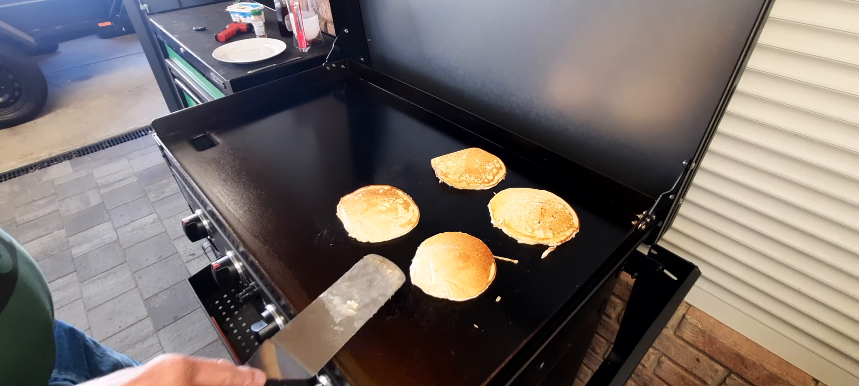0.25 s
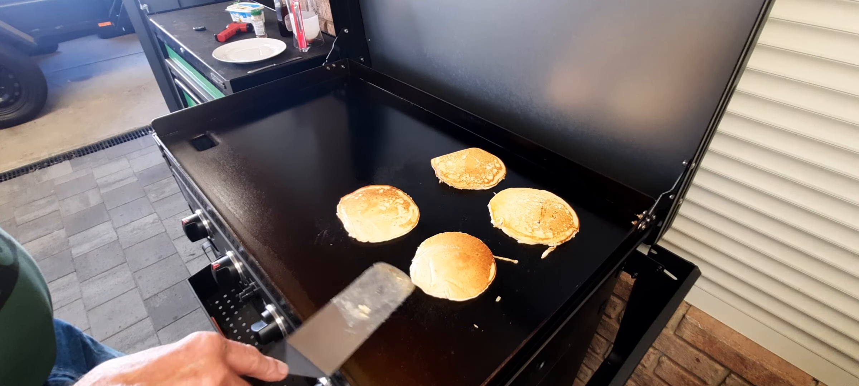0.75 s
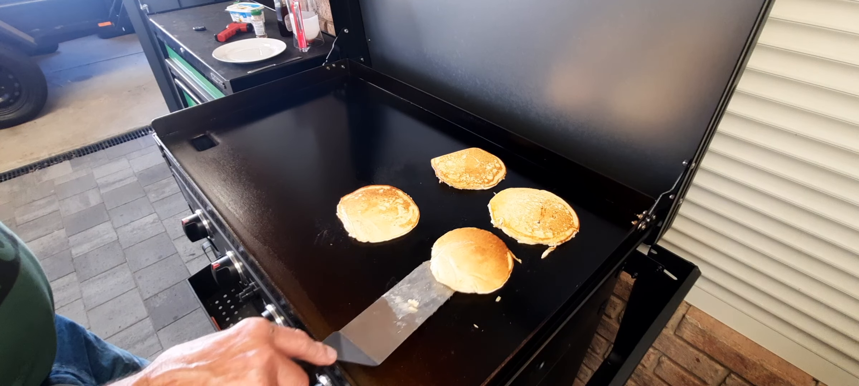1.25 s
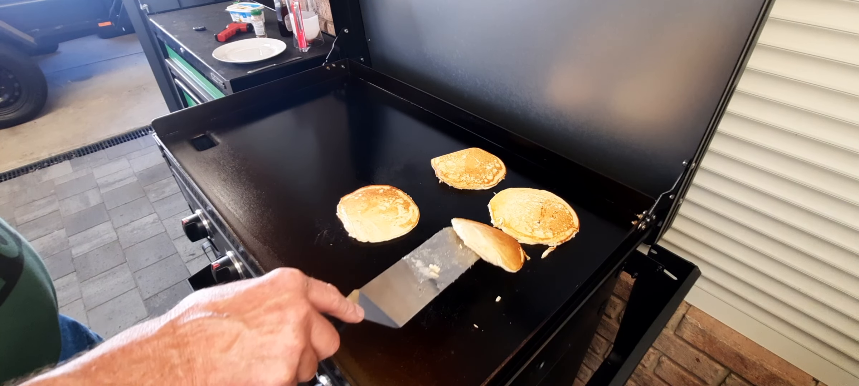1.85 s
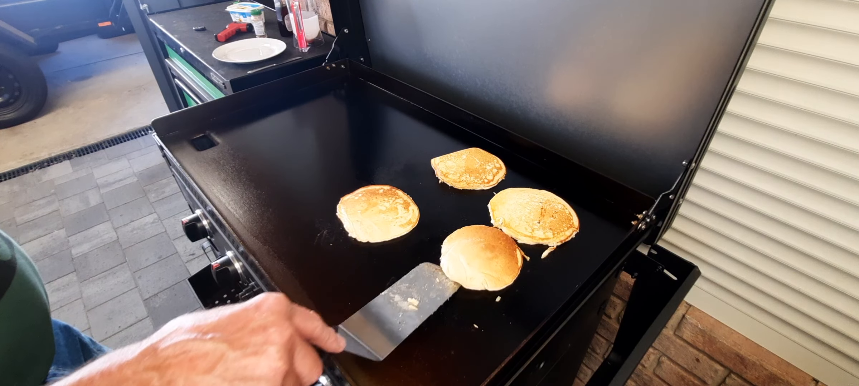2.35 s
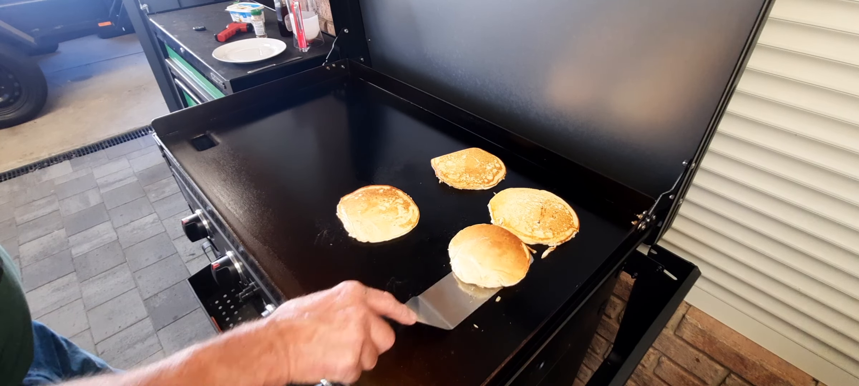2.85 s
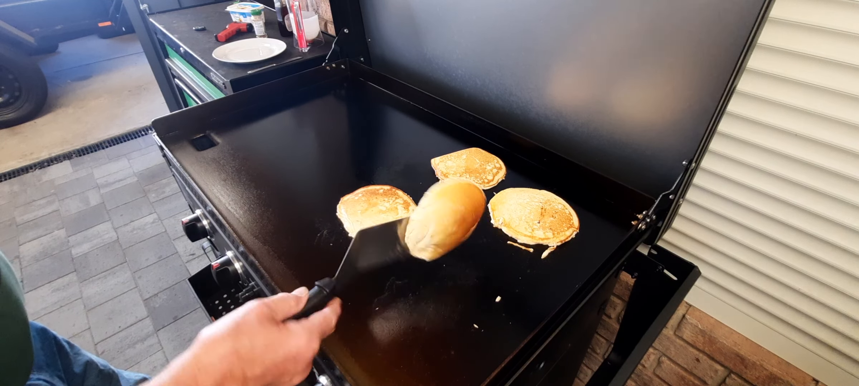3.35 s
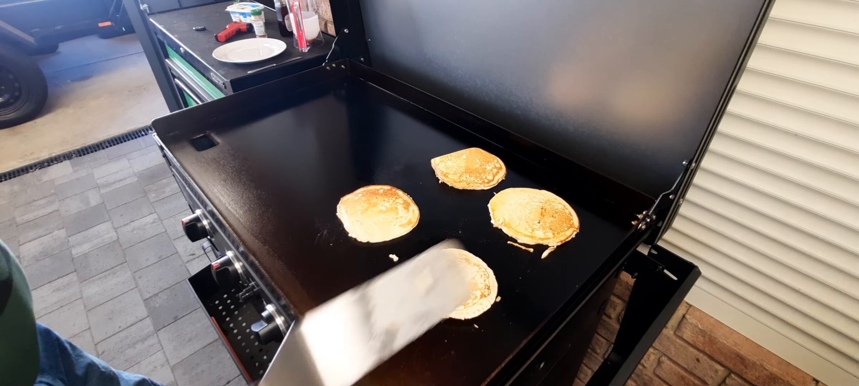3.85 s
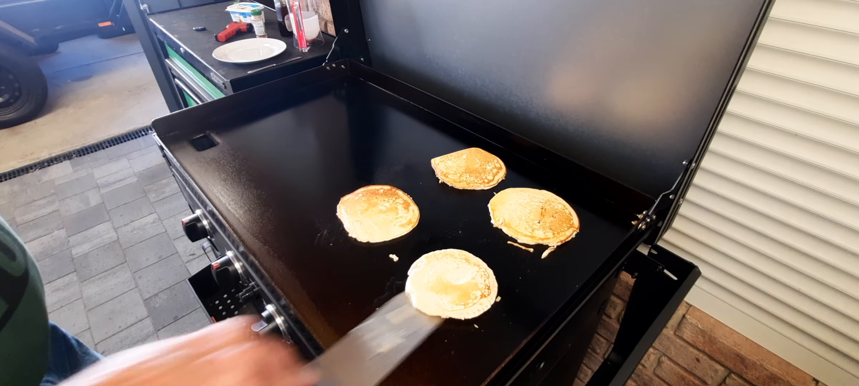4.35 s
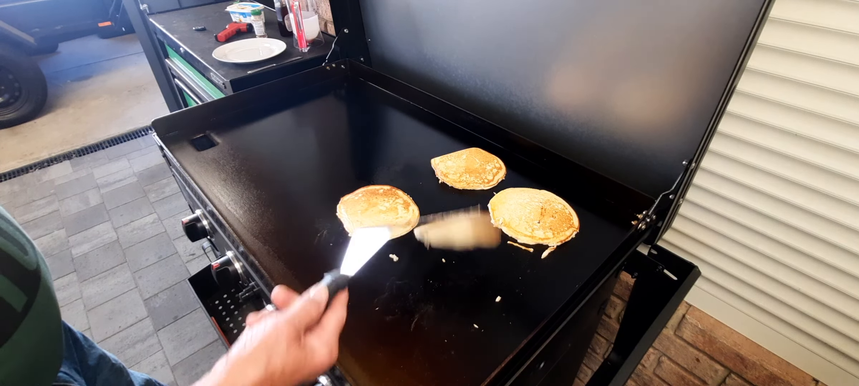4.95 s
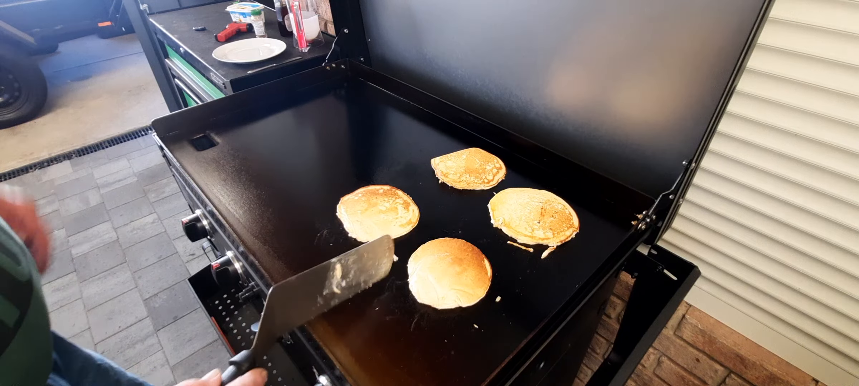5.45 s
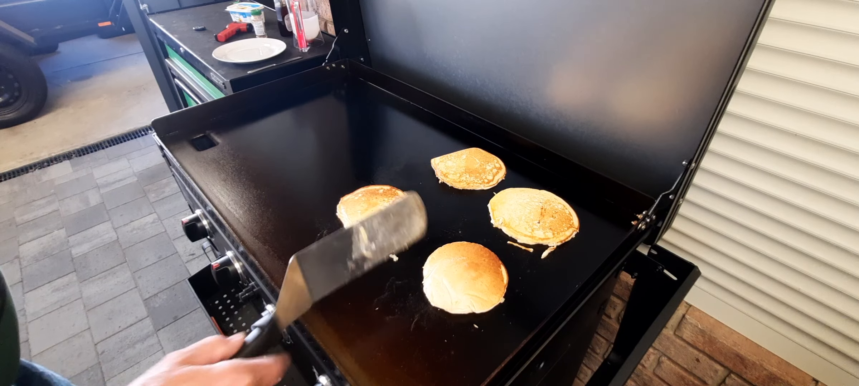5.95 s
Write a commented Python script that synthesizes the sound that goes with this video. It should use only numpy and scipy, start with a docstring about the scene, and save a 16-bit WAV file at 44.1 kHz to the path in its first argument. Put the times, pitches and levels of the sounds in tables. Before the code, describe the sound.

Short spatula rasps and sharp metallic clinks on a griddle, with two soft pancake landings and a quiet burner rumble and hiss.

```python
"""Turning pancakes on a patio griddle.

A thin metal spatula is set down, slid under a pancake in short rasping strokes and dragged along
the steel plate, which rings with every touch. Each rasp is a crowd of tiny slips; some end in a squeal.
The pancakes flop back softly; the burner rumbles and its gas jet hisses and whistles faintly."""
import sys
import numpy as np
from scipy import signal
from scipy.fft import rfft, irfft, next_fast_len
from scipy.io import wavfile

SR = 44100
rng = np.random.default_rng(int(sys.argv[2]) if len(sys.argv) > 2 else 0)


def generate_wav(signal):
    """Clip the signal to [-1, 1] and save it as 16-bit WAV at the path in sys.argv[1]."""
    frames = np.transpose(np.atleast_2d(signal))
    scaled = np.clip(frames, -1, 1) * 32767
    pcm = np.round(scaled).astype(np.int16)
    wavfile.write(sys.argv[1], SR, pcm)


N = 273953
TIME = np.arange(N) / SR


# the blade hits the plate: t/s, level/dB, brightness/Hz, chatter fade time/s
BLADE_KNOCKS = [(0.578, -18.5, 3460, 0.029), (0.793, -26, 12960, .006), (2.361, -5.5, 9200, 0.027),
                (2.433, -11.5, 6700, 0.0081), (4.085, -4.5, 6550, 0.033), (4.262, -17.5, 6800, 0.024),
                (5.483, -34.5, 9200, 0.0016), (5.562, -5.5, 2430, 0.0074), (5.605, -6, 1790, 0.03),
                (5.724, -19, 3600, 0.017)]

def knocks():
    """A knock is a chattering blow plus the snap of the blade's edge; brighter knocks snap harder."""
    force = np.zeros(N)
    for s, level_db, bright_hz, fade_s in BLADE_KNOCKS:
        snap_db = level_db - 9.5 + 8 * np.log2(bright_hz / 7000)
        force += blow(s, level_db, low_hz=600, high_hz=bright_hz, fade_s=fade_s, knee_hz=1974)
        force += blow(s, snap_db, low_hz=4470, high_hz=15000, fade_s=0.00069, knee_hz=11800)
    return force


# quick shoves under a pancake: t/s, length/s, level/dB, swell/dB, brightness/Hz, squeal centre/Hz
BLADE_SHOVES = [(1.174, 0.14, -40.5, -2, 2160, 1600), (2.548, 0.14, -53, 0.5, 8920, 1900),
                (2.655, 0.14, -21.5, 3, 11500, 6160), (4.32, 0.19, -21.5, 9, 15000, 2260)]
# tone of a shove: f/Hz, level/dB
SHOVE_TONE = [(150, -27.5), (300, -13), (450, -10), (600, -6), (800, -10), (1200, -6.5), (2000, 1.5),
              (3000, -3.5), (4200, -1.5), (5200, -5.5), (6600, -5.5), (8300, -11), (11500, -4.5),
              (15500, -7.5)]

def shoves():
    """The blade rasps quickly under a pancake, each time with its own brightness."""
    force = np.zeros(N)
    for start, length, level_db, swell_db, bright_hz, _ in BLADE_SHOVES:
        strength = push(start, length, level_db, swell_db)
        rasp = friction(strength, SHOVE_TONE, slips_per_s=3500, uneven_db=4)
        force += cut(rasp, bright_hz, "low", order=1)
    return force


# notes the blade squeals at: f/Hz, level against the shove/dB, rise and fall time/s
BLADE_NOTES = [(1877, -3, 0.071), (2520, -3, 0.02), (3940, -6.5, 0.063), (6290, -6.5, .06), (6670, -4, .07)]

def squeals():
    """Just before a shove stops, the slips briefly lock onto the blade's own notes."""
    out = np.zeros(N)
    for hz, note_db, rise_s in BLADE_NOTES:
        swell = 0
        for start, length, level_db, _, _, centre_hz in BLADE_SHOVES:
            peak_s = start + length - 0.07 + 0.011 * rng.standard_normal()
            octaves_away = abs(np.log2(hz / centre_hz))
            hump = np.cos(np.pi / 2 * np.clip((TIME - peak_s) / rise_s, -1, 1)) ** 4
            swell += amp(level_db + note_db - 6.5 * octaves_away) * hump
        wavering_hz = hz + 61 * drift(300)
        out += swell * np.sin(2 * np.pi * np.cumsum(wavering_hz) / SR)
    return out


# drags along the plate: t/s, length/s, level/dB, swell/dB
BLADE_DRAGS = [(5.566, .31, -46, -16)]
# tones of a drag's rasp and of its rumble: f/Hz, level/dB
DRAG_TONE = [(150, -34), (500, 2), (800, 4.5), (1250, -1), (2100, -7.5), (3300, -22), (5000, -26.5),
             (15000, -62)]
RUMBLE_TONE = [(70, -59), (160, -5.5), (300, -2), (420, 10.5), (700, -45), (2000, -32.5)]

def drags():
    """The blade's edge judders over the plate, which rumbles on a little after the rasp."""
    force = np.zeros(N)
    for start, length, level_db, swell_db in BLADE_DRAGS:
        rasp = push(start, length, level_db, swell_db)
        rumble = push(start, length + 0.052, level_db + 2, swell_db=-11.5)
        force += friction(rasp, DRAG_TONE, slips_per_s=1300, uneven_db=-1)
        force += friction(rumble, RUMBLE_TONE, slips_per_s=740, uneven_db=6)
    return force


# slow slides under a pancake: t/s, length/s, level/dB, swell/dB
BLADE_SLIDES = [(0.73, 0.43, -56, -4)]
# tone of a slide: f/Hz, level/dB
SLIDE_TONE = [(150, -15), (280, 4.5), (450, 4.5), (1200, -2.5), (2400, -1), (4500, -6.5), (7000, -9),
              (9000, -13.5), (15500, -9)]

def slides(jerks_per_s=10.57, jerk_db=2.2):
    """The blade creeps forward as the dough lets go in small regular jerks."""
    strength = 0
    for start, length, level_db, swell_db in BLADE_SLIDES:
        jerks = amp(-jerk_db * np.cos(2 * np.pi * jerks_per_s * (TIME - start)))
        strength += push(start, length, level_db, swell_db) * jerks
    return friction(strength, SLIDE_TONE, slips_per_s=1500, uneven_db=4)


# gentle pushes: t/s, length/s, level/dB, swell/dB
BLADE_NUDGES = [(1.675, .19, -58.5, -8.5), (1.93, .22, -56.5, -2.5)]
# tone of a nudge: f/Hz, level/dB
NUDGE_TONE = [(100, 8.5), (280, -8.5), (700, -8), (1500, -25.5), (4000, -25.5), (15000, -26)]

def nudges():
    """The blade moves a pancake along with a low, quiet rub."""
    strength = sum(push(*row) for row in BLADE_NUDGES)
    return friction(strength, NUDGE_TONE, slips_per_s=1900, uneven_db=-2.5)


# how long the plate's dense ring lasts: f/Hz, time to fall 60 dB/s
RING_TIMES = [(100, .5), (300, 1), (1000, 0.9), (2200, 0.45), (4500, 0.36), (8000, 0.25), (15000, 0.17)]

def griddle(force):
    """Steel answers a touch with a fast-dying clash, a longer dense ring and a few clear notes."""
    notes = through(force, plate_notes())
    bending = pressed_plate(force)
    ring = through(bending, dying_noise(RING_TIMES, treble_spacing_hz=9.2))
    # as the point of contact moves, the force passes between two sets of muffled vibrations
    place = 2 * np.pi * 2 * TIME + 0.5 * drift(20)
    clash_times = [(100, 0.136), (10000, 0.068)]   # f/Hz, time to fall 60 dB/s
    clash = 0
    for share in (np.cos(place), np.sin(place)):
        clash += through(bending * share, dying_noise(clash_times, treble_spacing_hz=26))
    return amp(-10) * force + amp(-2) * clash + amp(-3.5) * ring + notes


# strongest notes of plate and blade: f/Hz, relative level/dB, longest time to fall 60 dB/s
STEEL_NOTES = [(159.3, 4, 0.15), (243, 11.5, 0.73), (288, 18, 1), (294.1, 21.5, 1.0), (318, 14.5, 1),
               (406.6, 5, 0.96), (552, 6.5, 0.35), (563.7, 13, 1), (813, 12.5, 0.99), (839, 6, 0.65),
               (867, 10.5, 0.39), (1020, 9, 1), (1143, 10, 0.18), (1192, 17, 1), (1450, -3, 0.45),
               (1433, 13.5, 0.23), (1471, 12.5, 0.27), (1631, 11, .5), (1904, 7, 0.12), (1834, 5.5, 0.71),
               (2080, 4.5, .35), (2125, 5.5, 1), (2356, 9.5, 0.72), (2438, -4.5, 0.42), (3176, 6.5, 0.29),
               (3242, 10.5, 0.092), (3440, 8.5, 0.14), (3780, 10, .3), (3890, 7.5, 0.21), (4850, 4, 0.14),
               (6170, 9, 0.077), (6350, 4, .2), (6576, 4.5, .22), (6390, 15, 0.16), (11751, 9, 0.13)]

def plate_notes():
    """The steel's clear answer to one tap: each note is a fading sine wave."""
    t = TIME[:SR]
    out = 0
    for hz, level_db, ring_s in STEEL_NOTES:
        decay = np.log(1000) / min(ring_s, 18 / np.sqrt(hz))   # dough and oil cut high notes short
        fade = 2 * decay / SR * np.exp(-decay * t)
        ear_shift = np.arccos(np.clip(at_hz(EAR_LIKENESS, hz), -1, 1))   # the ears hear it out of step
        phase = rng.uniform(0, 2 * np.pi) + ear_shift * rng.choice([-1, 1]) * np.array([[1], [0]])
        out += amp(level_db - 1) * fade * np.sin(2 * np.pi * hz * t + phase)
    return out


# pitch ranges the plate favours under the blade: f/Hz, width/Hz, level/dB
PLATE_PEAKS = [(310, 53, 2), (565, 55, 0), (832, 200, -6), (1018, 75, 0.5), (1174, 66, 1.5),
               (1442, 130, -1), (1867, 61, 0), (2045, 52, 3.5), (2575, 600, -1)]

def pressed_plate(force):
    """Low bending waves gather in broad peaks with hollows between; the treble passes evenly."""
    peaks = 0
    for hz, width_hz, db in PLATE_PEAKS:
        peaks += amp(db) * signal.lfilter(*signal.iirpeak(hz, hz / width_hz, fs=SR), force)
    return peaks + amp(-22) * force + cut(force, 2900, "high", order=4)


# a flipped pancake lands: t/s, edge arrives earlier by/s, smack/dB, smack fade time/s, thud/dB
PANCAKE_LANDINGS = [(3.556, 0.053, -22.5, .0068, -28), (5.071, .038, -19, 0.0011, -13.5)]
# soft bumps of dough or blade: t/s, level in the plate/dB
SOFT_BUMPS = [(1.698, -30), (2.03, -27.5), (2.548, -17.5), (3.301, -29), (3.802, -37), (4.001, -30.5)]

def pancakes():
    """A pancake's edge touches, its face smacks down, then its weight thuds; bumps only pat."""
    out = sum(slap(s, db=-37.5, low_hz=255, high_hz=790, fade_s=0.0029) for s, _ in SOFT_BUMPS)
    for s, lead_s, smack_db, smack_s, thud_db in PANCAKE_LANDINGS:
        out += slap(s - lead_s, db=-35, low_hz=640, high_hz=7000, fade_s=0.006)
        out += slap(s, smack_db, low_hz=940, high_hz=15000, fade_s=smack_s)
        out += slap(s, thud_db - 1.5, low_hz=406, high_hz=1080, fade_s=0.00206)
        out += slap(s + 0.0027, thud_db, low_hz=176.7, high_hz=419, fade_s=0.0041)
    return out


def thumps():
    """The soft weight of a bump, a landing or the settling blade wakes the plate's low notes."""
    landings = [(s, thud_db - 5.5) for s, _, _, _, thud_db in PANCAKE_LANDINGS]
    # the blade settles just after a knock, and its level varies less than the knock's
    settles = [(s + 0.04, -17 + 0.42 * level_db) for s, level_db, _, _ in BLADE_KNOCKS]
    weights = SOFT_BUMPS + landings + settles
    return sum(blow(s, db, low_hz=270, high_hz=360, fade_s=0.0082, knee_hz=400) for s, db in weights)


# tones of the flame and of the gas jet: f/Hz, level/dB
FLAME_TONE = [(15, -55), (25, -31), (75, -5), (127, -11), (143, -10.5), (165, 0.5), (206, -10), (228, -0.5),
              (261, -9.5), (344, -3.5), (430, -21), (585, -17), (1500, -42.5), (1950, -72.5), (3300, -120)]
JET_TONE = [(700, -0.5), (1500, -5), (2600, 1), (4000, -13), (5200, -3), (6400, -5), (7400, -3.5),
            (8400, -13), (9400, -1.5), (10500, -3), (15800, -0.5)]

def gas(whistle_band_hz=(7715, 7885)):
    """The flame rumbles unsteadily; the jet hisses with a thin whistle."""
    flame = rms_one(colour(stereo_noise(N), FLAME_TONE)) * amp(1.1 * drift(33))
    hiss = rms_one(colour(stereo_noise(N), JET_TONE))
    whistle = rms_one(cut(stereo_noise(N), whistle_band_hz, "band", order=2))
    return amp(-62.5) * flame + amp(-67.5) * hiss + amp(-74) * whistle


# how long the patio echoes: f/Hz, time to fall 60 dB/s
ECHO_TIMES = [(100, 0.6), (1000, 0.54), (4000, 0.24), (15000, 0.28)]

def patio(x, echo_db):
    """Direct sound plus a wash of echoes from wall, lid and paving."""
    return x + amp(echo_db) * through(x, dying_noise(ECHO_TIMES))


def push(start, length, level_db, swell_db, attack_s=0.047, release_s=0.069):
    """Strength of a stroke: it gathers speed, holds while the pressure swells or fades, and stops."""
    t = TIME - start
    starting = np.sin(np.pi / 2 * np.clip(t / attack_s, 0, 1))
    stopping = np.sin(np.pi / 2 * np.clip((length - t) / release_s, 0, 1))
    pressure = amp(level_db + swell_db * (np.clip(t / length, 0, 1) - 0.5))
    return (starting * stopping) ** 2 * pressure


def friction(strength, tone, slips_per_s, uneven_db):
    """Rubbing is a stream of tiny slips, louder where the blade grips."""
    slips = (rng.random(N) < slips_per_s / SR) * rng.standard_normal(N)
    grip = amp(uneven_db * drift(220))
    return rms_one(colour(slips, tone) * grip) * strength


def blow(s, db, low_hz, high_hz, fade_s, knee_hz):
    """A hit made of many tiny contacts that die away, gently dulled above knee_hz."""
    burst = rng.standard_normal(SR // 8) * np.exp(-TIME[:SR // 8] / fade_s)
    burst = cut(burst, low_hz, "high", order=2)
    burst = cut(burst, high_hz, "low", order=2)
    burst = cut(burst, knee_hz, "low", order=1)
    return amp(db) * np.pad(burst / np.linalg.norm(burst), (round(s * SR), N))[:N]


def slap(s, db, low_hz, high_hz, fade_s):
    """A short dead blow of soft dough."""
    return blow(s, db, low_hz, high_hz, fade_s, knee_hz=np.sqrt(low_hz * high_hz))


def dying_noise(fade_times, treble_spacing_hz=1):
    """One second of random tones, each half octave dying at its own rate."""
    hz = np.arange(SR // 2 + 1)
    has_tone = (hz < 2600) | (rng.random(len(hz)) * treble_spacing_hz < 1)   # gaps sound like metal
    spectrum = rfft(stereo_noise(SR)) * has_tone
    edges_hz = SR / 2 ** np.arange(10, 0.9, -0.5)
    out = 0
    for low, high in zip(edges_hz, edges_hz[1:]):
        band = irfft(spectrum * ((hz >= low) & (hz < high)))
        fade = amp(-60 * TIME[:SR] / at_hz(fade_times, np.sqrt(low * high)))
        out += rms_one(band * fade) * np.sqrt(2 * (high - low)) / SR
    return out


# how alike left and right sound: f/Hz, likeness (1 the same, 0 unrelated, -1 opposite)
EAR_LIKENESS = [(60, 0), (130, 0.94), (300, -0.1), (640, 0.5), (1400, -0.12), (3000, 0.1), (15000, -0.5)]

def stereo_noise(size):
    """White noise for two ears, more alike at some pitches than at others."""
    padded = next_fast_len(size)
    mid, side = rfft(rng.standard_normal((2, padded)))
    alike = np.clip(at_hz(EAR_LIKENESS, np.linspace(0, SR / 2, len(mid))), -1, 1)
    spectrum = np.sqrt(1 + alike) * mid + np.sqrt(1 - alike) * side * [[1], [-1]]
    return irfft(spectrum, padded)[:, :size]


def amp(db):
    """Turn decibels into gain."""
    return 10 ** (np.asarray(db) / 20)


def rms_one(x):
    """Scale to an average power of 1."""
    return x / np.sqrt(np.mean(x ** 2) + 1e-20)


def at_hz(points, hz):
    """Read between a table's rows on a pitch scale."""
    known_hz, values = np.transpose(points)
    return np.interp(np.log(np.maximum(hz, 1)), np.log(known_hz), values)


def colour(x, tone):
    """Make each frequency louder or softer as a tone table says."""
    size = next_fast_len(x.shape[-1])
    gain = amp(at_hz(tone, np.fft.rfftfreq(size, 1 / SR)))
    return irfft(rfft(x, size) * gain, size)[..., :x.shape[-1]]


def cut(x, hz, keep, order):
    """Filter that keeps the lows, the highs or a band."""
    return signal.sosfilt(signal.butter(order, hz, keep, fs=SR, output="sos"), x)


def drift(per_s):
    """Random wander of size about 1."""
    turns = rng.standard_normal(4096)
    return np.interp(TIME * per_s, np.arange(len(turns)), turns)


def through(x, response):
    """Let every sample of a mono signal set off a stereo ring or echo."""
    return signal.fftconvolve(x[None], response, axes=1)[:, :N]


def scene():
    """Blade and dough both shake the plate, over the steady gas."""
    dough = pancakes()
    scrapes = slides() + nudges() + drags() + shoves()
    force = scrapes + knocks() + thumps() + amp(-9.5) * cut(dough, 700, "low", order=2)
    return griddle(force) + patio(dough, echo_db=1) + patio(squeals(), echo_db=-14) + gas()


# shading of the left microphone: f/Hz, level against the right/dB
LEFT_SHADE = [(60, -7), (110, -8.5), (200, -13.5), (380, -9.5), (700, -7.5), (1300, -9.5), (4400, -8.5),
              (8100, -10.5), (15000, -19)]

def record(dry):
    """The left side is shaded, most in the top treble; both are turned up and lose the very top."""
    both_sides = amp(6) * np.array([colour(dry[0], LEFT_SHADE), dry[1]])
    top_cut = signal.ellip(12, 0.1, 80, 15900, fs=SR, output="sos")
    return signal.sosfilt(top_cut, both_sides)


dry = scene()
out = record(dry)
generate_wav(out)
```